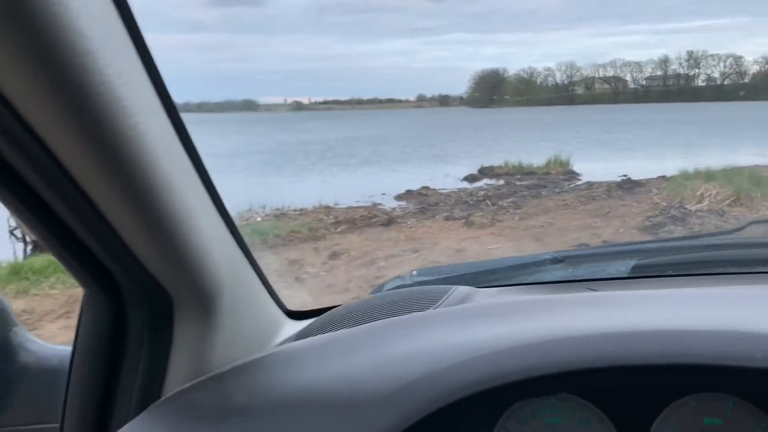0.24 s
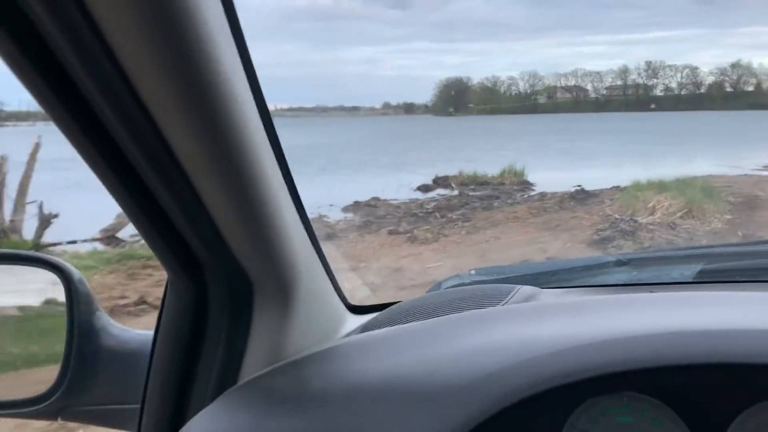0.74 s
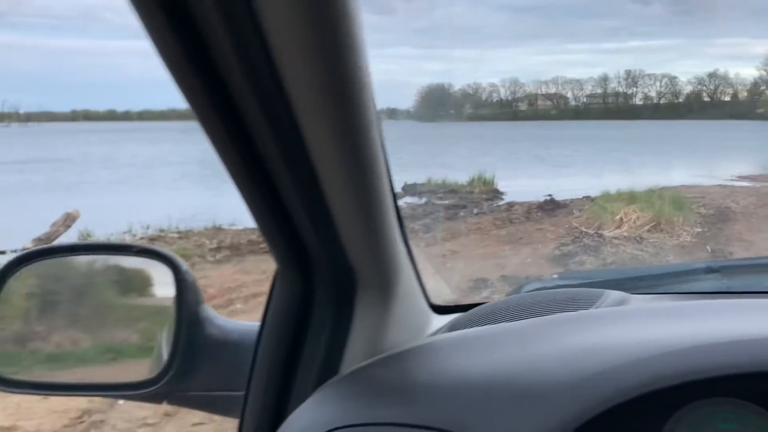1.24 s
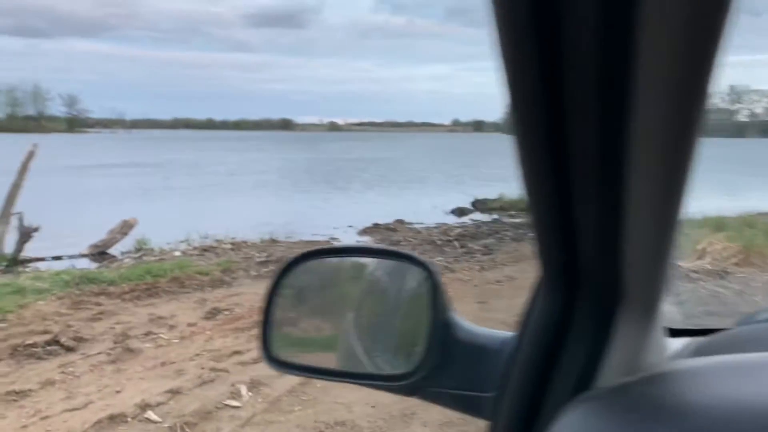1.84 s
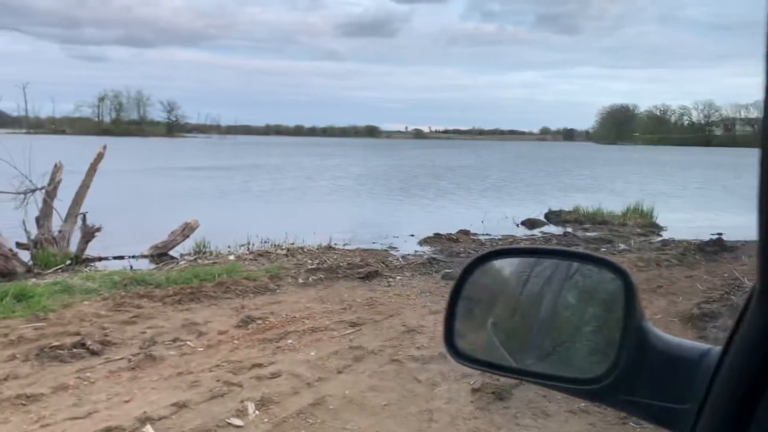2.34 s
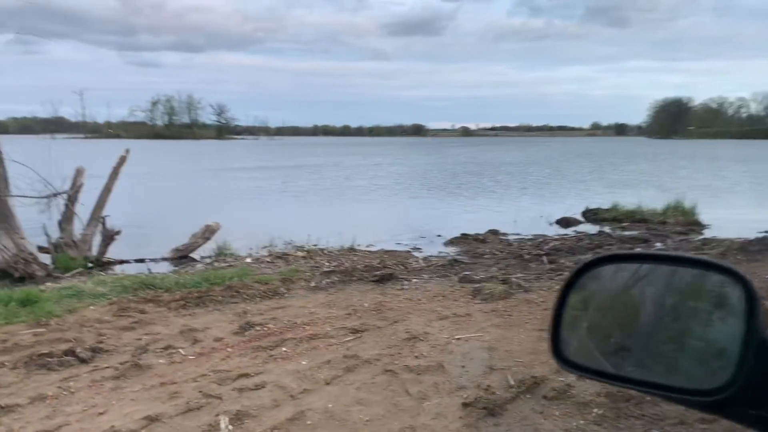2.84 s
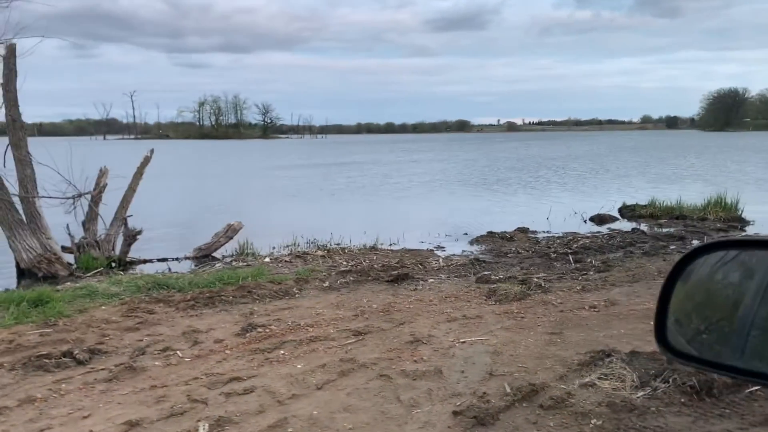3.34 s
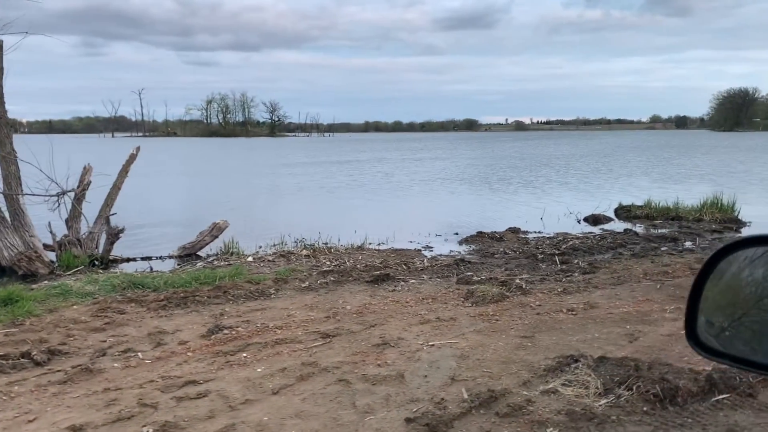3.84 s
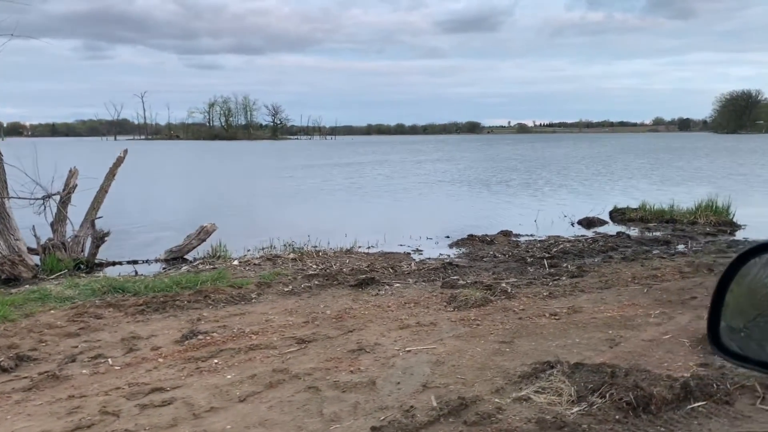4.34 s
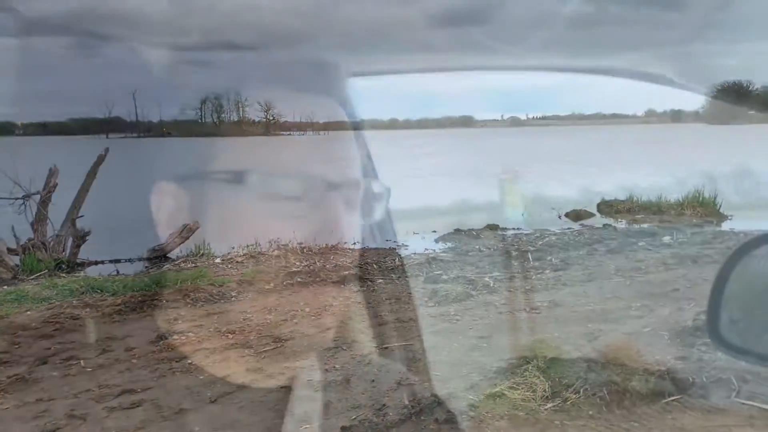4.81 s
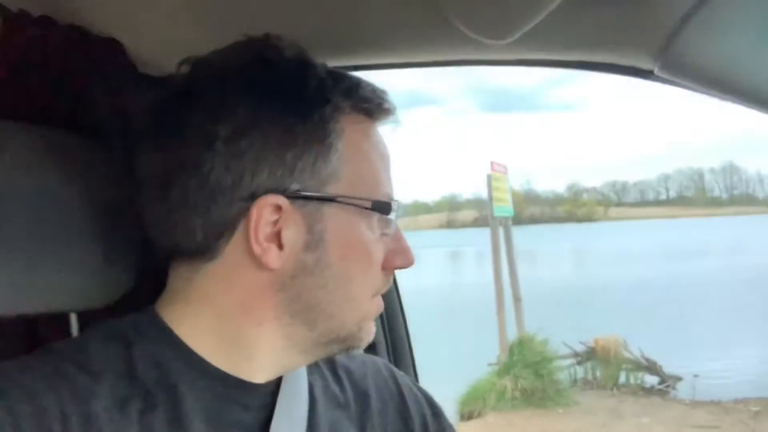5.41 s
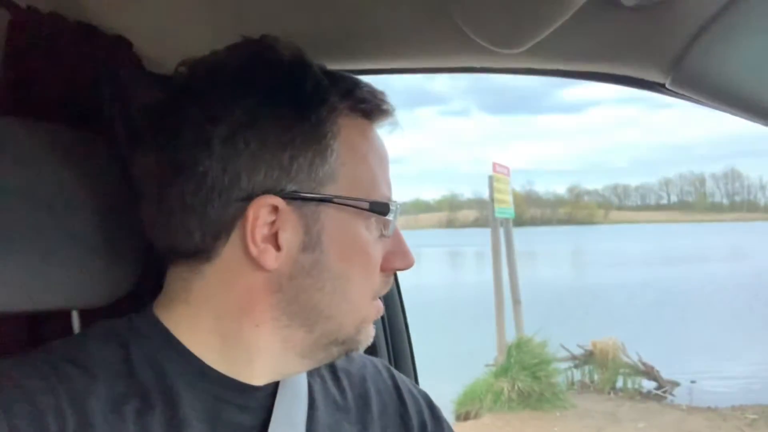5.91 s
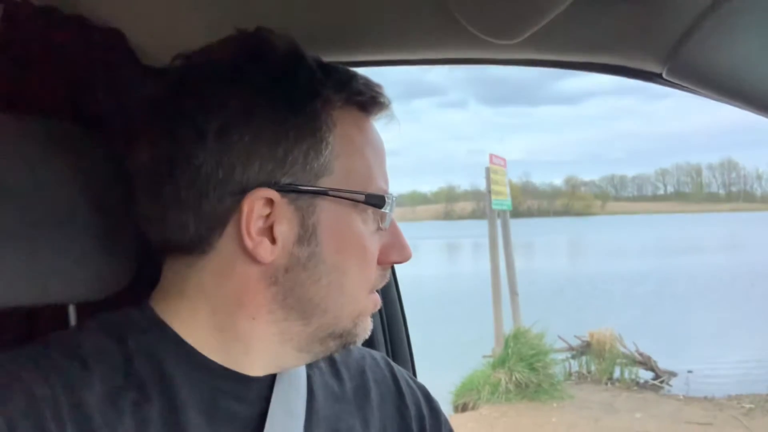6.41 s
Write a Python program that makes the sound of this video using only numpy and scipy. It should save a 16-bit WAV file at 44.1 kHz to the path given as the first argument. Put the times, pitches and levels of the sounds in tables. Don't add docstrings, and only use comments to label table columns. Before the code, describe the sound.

A close phone microphone in a van cabin hears heavy low rumble from tyres on dirt, a droning engine that speeds up and then eases, and uneven body knocks. Hands rub the steering wheel with an airy hiss. Past four seconds the drive fades away, leaving near-quiet cabin air and a low hum, one bright sharp latch click, then a run of dry stick-slip seat creaks.

```python
import sys
import numpy as np
from scipy import signal
from scipy.fft import rfft, irfft, next_fast_len
from scipy.io import wavfile
from scipy.ndimage import uniform_filter1d, minimum_filter1d

SR = 44100
rng = np.random.default_rng(int(sys.argv[2]) if len(sys.argv) > 2 else 0)


def rack_gain(trim_db):
    fader = np.asarray(trim_db, float)
    return 10 ** (fader / 20)


def store_wav(level_fs):
    pcm = np.round(np.clip(np.atleast_2d(level_fs), -1, 1) * 32767)
    wavfile.write(sys.argv[1], SR, pcm.T.astype(np.int16))


N = 293697
T = np.arange(N) / SR
HZ = np.maximum(np.fft.rfftfreq(next_fast_len(N), 1 / SR), 1)
FADE_S = (4.253, 5.42)


def curve(table, column):
    rows = np.array(table, float)
    return np.interp(T, rows[:, 0], rows[:, column], left=-150, right=-150)


def on_log(table, hz):
    rows = np.array(table, float)
    return np.interp(np.log(hz), np.log(rows[:, 0]), rows[:, 1])


def unit(x):
    return x / np.sqrt(np.mean(x ** 2) + 1e-30)


def shape(x, gain):
    return irfft(rfft(x, next_fast_len(N)) * gain, next_fast_len(N))[..., :N]


def high_pass(x, order, hz):
    return signal.sosfilt(signal.butter(order, hz, "high", fs=SR, output="sos"), x)


def walk(rate_hz):
    hold = int(SR / rate_hz)
    steps = np.repeat(rng.standard_normal(N // hold + 1), hold)
    smooth = uniform_filter1d(uniform_filter1d(steps, hold), hold)
    return unit(smooth[:N])


def ring(x, hz, t60):
    r = np.exp(-np.log(1000) / (max(t60, .003) * SR))
    w = 2 * np.pi * hz / SR
    return signal.lfilter([0, np.sin(w)], [1, -2 * r * np.cos(w), r * r], x)


# pitch_hz, side_minus_mid_db
SIDE_LEVEL = [(60, -12), (110, -17), (200, -15), (280, -6.5), (380, 0), (700, -1), (1290, 1), (2380, 0),
              (4400, -1), (8120, -3), (15000, 0.5)]


def wide(mid_side):
    lead = .6
    early = shape(mid_side[0], 1j)
    side = shape(np.sqrt(1 - lead ** 2) * mid_side[1] + lead * early, rack_gain(on_log(SIDE_LEVEL, HZ)))
    return np.array([mid_side[0] + side, mid_side[0] - side])


def noise(gain, lo_hz, hi_hz, flicker_db, rate_hz, drive=1):
    spectrum = rfft(rng.standard_normal((2, N)) * drive, next_fast_len(N)) * gain
    out = 0
    for octave in np.arange(np.log2(lo_hz), np.log2(hi_hz) + .01, .5):
        window = np.cos(np.pi * np.clip(np.log2(HZ) - octave, -.5, .5))
        band = irfft(spectrum * window, next_fast_len(N))[:, :N]
        out = out + band * rack_gain(flicker_db * walk(rate_hz))
    return out / np.std(out[0])


def blows(times, dbs, burst_s, rise_s):
    out = np.zeros((2, N + SR))
    t = np.arange(min(int(7 * burst_s * SR), SR // 3)) / SR
    swell = (1 - np.exp(-t / rise_s)) ** 2 * np.exp(-t / burst_s)
    for s, db in zip(times, dbs):
        burst = rng.standard_normal((2, len(t))) * swell
        out[:, int(s * SR):int(s * SR) + len(t)] += rack_gain(db) * burst / np.sqrt(np.sum(swell ** 2))
    return out[:, :N]


def clicks(times, dbs):
    out = np.zeros((2, N))
    at = (np.array(times) * SR).astype(int)
    out[0, at] = rack_gain(dbs)
    out[1, at + rng.integers(-12, 12, size=len(at))] = rack_gain(dbs)
    return uniform_filter1d(out, size=10) * 10


def floor_shake():
    s, thud_db, clack_db, _ = np.transpose(KNOCKS)
    shake = np.zeros(N)
    shake[(s * SR).astype(int)] = rack_gain(thud_db + 0.3 * clack_db + 40)
    shake = signal.lfilter([1], [1, -np.exp(-1 / (0.026 * SR))], shake)
    return 1 + uniform_filter1d(shake, size=400)


# time_s, rolling_force_db, rut_depth_db (above an even surface)
ROLLING = [(0, -59, 8.5), (.1, -58.5, 1), (.3, -56.5, 0.5), (.55, -56.5, 4.5), (.85, -58, 5),
           (1.05, -58.5, 5), (1.3, -58, 0.5), (1.6, -57, 0.5), (1.95, -58.5, -1.5), (2.4, -59.5, 1),
           (3, -60, -3), (3.6, -60.5, -4.5), (3.8, -58.5, 10), (4.07, -59.5, -2), (4.46, -62, -0.5),
           (4.9, -65.5, -2.5), (5.26, -76, 1.5), (5.6, -104, -7.5)]
# pitch_hz, level_db (per Hz)
ROAD_COLOUR = [(12, -37.5), (20, -2), (49, 1.5), (211, -12), (251, -15), (285, -16), (332, -19),
               (449, -30.5), (501, -26), (649, -37.5), (771, -37), (1380, -48.5), (3500, -72.5),
               (4550, -79.5), (7700, -120)]
# pitch_hz, width_hz, level_db
BODY_PANELS = [(66, 2.6, 12), (150, 11, 1.5), (208, 14, -1.5), (280.8, 17, 4), (496, 15, 2.5), (745, 23, 9)]


def tyres():
    panels = 1 + sum((rack_gain(db) - 1) / (1 + (2 * (HZ - hz) / width) ** 2) for hz, width, db in BODY_PANELS)
    gain = rack_gain(on_log(ROAD_COLOUR, HZ)) * panels
    stones = (rng.random(N) < 150 / SR) * rack_gain(np.minimum(rng.exponential(size=N), 5.0))
    crush = 1 + 0.29 * signal.lfilter([1], [1, -np.exp(-1 / (0.023 * SR))], stones)
    roll_db = curve(ROLLING, column=1)
    rut_db = np.clip(curve(ROLLING, column=2), -20, 20)
    sway_db = roll_db + 2 + .6 * rut_db + 2.5 * walk(4.6)
    boom_db = roll_db + 13.5 + rut_db
    body_db = 0.93 * (roll_db + 60.5) - 60 + 14.5 - 0.47 * rut_db
    sway = noise(gain, 21, 34, 1.9, 3.4) * rack_gain(sway_db)
    boom = noise(gain, 51.3, 72, 2.4, 7.2) * rack_gain(boom_db)
    body = noise(gain, 85.9, 290, 0.94, 4.395) * rack_gain(body_db)
    crunch = noise(gain, 368.6, 3200, 2.3, 24, crush) * rack_gain(roll_db)
    return wide(sway + boom + (body + crunch) * floor_shake()) * np.array([[.93], [1.07]])


# time_s, firing_rate_hz, boom_db
ENGINE_SPEED = [(0, 37.5, -36.5), (.1, 37.6, -51), (.19, 37.38, -37.5), (.3, 36.4, -35.5),
                (.43, 36.75, -49), (.5, 37.9, -38), (.76, 39.18, -35), (.85, 38.88, -47),
                (.98, 39.56, -31.5), (1.06, 40.97, -55), (1.13, 42.76, -33.5), (1.28, 43.5, -40.5),
                (1.45, 44.78, -36), (1.55, 44.5, -40), (1.69, 44.56, -35.5), (1.79, 44.74, -51),
                (1.86, 44.74, -40.5), (2.1, 43.13, -46.5), (2.5, 41.3, -47.5), (3, 41.15, -49.5),
                (3.4, 40, -45.5), (3.53, 40.3, -53.5), (3.73, 39.63, -45.5), (3.9, 39.46, -51),
                (4.13, 38.96, -39.5), (4.4, 39.54, -39.5), (4.7, 39.08, -45.5), (5.1, 39.03, -51),
                (5.4, 38.8, -75)]
# multiple_of_firing_rate, level_db
FIRING_OVERTONES = [(1, 0), (2, -16), (3, -12), (4, -22)]
# time_s, pitch_hz, level_db
PUMP_WHINE = [(0, 348, -57.5), (.3, 360.6, -66), (.6, 372.3, -57.5), (.8, 389.4, -61.5), (1.05, 408, -69),
              (1.3, 428, -69), (1.45, 448, -85)]
# pitch_hz, level_db
MOTOR_TONES = [(143, -62), (167, -56), (222, -62), (285.3, -60.5)]


def engine():
    firing_hz = np.maximum(curve(ENGINE_SPEED, column=1), 0) * (1 + 0.0078 * walk(8.4))
    phase = 2 * np.pi * np.cumsum(firing_hz) / SR
    boom = sum(rack_gain(db + 3.1 * walk(10.0)) * np.sin(k * phase) for k, db in FIRING_OVERTONES)
    boom = boom * rack_gain(curve(ENGINE_SPEED, column=2))
    pump_phase = 2 * np.pi * np.cumsum(curve(PUMP_WHINE, column=1)) / SR
    whine = np.sin(pump_phase) + .36 * np.sin(1.5 * pump_phase)
    pump = rack_gain(curve(PUMP_WHINE, column=2) + 2.5 * walk(10)) * whine
    drone = 0
    for hz, db in MOTOR_TONES:
        drone = drone + rack_gain(db + 3.04 * walk(3.1)) * np.sin(2 * np.pi * hz * T + 1.4 * walk(14))
    drone = drone * np.interp(T, [1.3, 2.0, *FADE_S], [0.32, 0.99, 1, 0.0092])
    return np.sqrt(2) * (boom * np.array([[.9], [1.1]]) + (pump + drone) * np.array([[1.3], [.6]]))


# start_s, thud_db, clack_db (above the thud), thud_pitch_hz
KNOCKS = [(0.2270, -26.5, -19, 138), (0.3683, -25.5, -19.5, 142.3), (0.772, -55, -9, 62),
          (1.234, -30.5, -23, 121), (1.623, -26.5, -48, 64.7), (1.766, -23.5, -25, 151.3),
          (1.793, -34.5, -33, 200), (1.81, -30.5, -45, 202), (1.824, -34.5, -53, 167),
          (1.887, -59, -34, 102), (1.984, -36, -31, 150.3), (2.395, -40, -63, 83), (3.399, -37.5, -64, 90),
          (3.687, -23.5, -66.5, 201.8), (3.715, -25, -58, 90.8), (3.8, -26.5, -58, 71.1),
          (3.879, -29, -57.5, 64.8), (4.271, -33.5, -51, 88.56), (4.15, -37.5, -50, 200),
          (4.321, -33, -57.5, 225)]
# pitch_hz, level_db, ring_s (time to fall 60 dB)
BRACKETS = [(430, -13, 0.015), (720, -1.5, 0.056), (870, -2.5, 0.036), (990, 3.5, 0.11), (1350, 2, 0.05),
            (1550, 7.5, 0.022), (1666, -3.5, 0.015), (1805, -1, 0.046), (2013, -6, 0.05),
            (2140, -20.5, 0.043), (2780, -8.5, 0.034), (3560, -6, .04), (4100, -17, .025)]


def knocks():
    s, thud_db, clack_db, _ = np.transpose(KNOCKS)
    thud = np.zeros((2, N + SR))
    t = np.arange(int(.3 * SR)) / SR
    swell = (1 - np.exp(-t / .005)) ** 2
    for at, db, rel_db, hz in KNOCKS:
        swing = np.sin(2 * np.pi * hz * t) + .5 * np.sin(2 * np.pi * 112 * t)
        low_panel = 0.23 * np.sin(2 * np.pi * 213 * t + 6 * rng.random())
        high_panel = 0.33 * np.sin(2 * np.pi * 288 * t + 6 * rng.random())
        panel = low_panel + high_panel * np.array([[1.3], [.6]])
        panel = panel * rack_gain(0.35 * (rel_db + 25.0)) * np.exp(-t / 0.028)
        sound = swing * np.exp(-t * hz / 2.75) + panel
        start = int(at * SR) - 100
        thud[:, start:start + len(t)] += rack_gain(db + 5.0) * sound * swell
    thud[:, :len(t)] += rack_gain(-35.0) * np.cos(2 * np.pi * 55 * t) * np.exp(-t / .03)
    hit = blows(s - .003, thud_db + clack_db + 1, .0125, .005)
    clack = sum(rack_gain(db - 4.0) * ring(hit, hz, 0.55 * t60) for hz, db, t60 in BRACKETS)
    crunch_band = signal.butter(2, [400, 2300], "band", fs=SR, output="sos")
    crunch = rack_gain(27.0) * signal.sosfilt(crunch_band, hit)
    dull = signal.sosfilt(signal.butter(8, 2120, fs=SR, output="sos"), clack + crunch)
    return thud[:, :N] + wide(dull + rack_gain(-16.5) * clack)


# fastest_s, speeding_up_s, slowing_down_s, fine_hiss_db, coarse_hiss_db, finest_hiss_db
SLIDES = [
    (0.798, 0.0041, 0.015, -66, -63, -68),
    (.92, 0.14, 0.23, -69, -69, -76),
    (1.38, 0.64, 0.5, -63, -65.5, -59.5),
    (1.8, 0.3, 0.16, -67.5, -67, -65.5),
    (2.2, 0.22, 0.15, -73.5, -73.5, -72),
    (2.86, 0.45, 0.22, -85, -77.5, -84.5),
    (3.06, 0.14, 0.19, -70.5, -75.5, -73.5),
    (3.16, 0.082, 0.18, -65, -71, -62.5),
    (3.27, 0.15, 0.079, -70, -68, -58),
    (3.47, 0.3, 0.27, -85.5, -88, -85),
]


def slides():
    power = 0
    t = T[::64]
    for s, rise_s, fall_s, *hiss_db in SLIDES:
        swell_db = -16.5 * ((t - s) / np.where(t < s, rise_s, fall_s)) ** 2
        power = power + rack_gain(2 * (swell_db + np.array(hiss_db)[:, None]))
    let_go = np.clip((T - .795) / 0.0046, 0, 1)
    return [np.interp(T, t, level) * let_go for level in np.sqrt(power)]


def patchy(x, patchy_db):
    z = signal.stft(x, SR, nperseg=1024)[2]
    field = uniform_filter1d(uniform_filter1d(rng.standard_normal(z.shape[1:]), size=12, axis=0), size=9)
    return signal.istft(z * rack_gain(patchy_db * unit(field)), SR, nperseg=1024)[1][:, :N]


# pitch_hz, level_db (per Hz)
SKIN_COLOUR = [(1200, 3.5), (1900, -3.5), (2700, -1.5), (4080, -2), (4760, 3), (5600, 0.5), (6650, -1.5),
               (7600, -4), (8500, -0.5), (10300, -4), (12400, -7.5), (14600, -4), (16000, -6.5)]


def hands():
    fine, coarse, finest = slides()
    skin = rack_gain(on_log(SKIN_COLOUR, HZ))
    hiss = noise(skin, 7370, 7400, 1.5, 28.25) * fine
    hiss = hiss + noise(skin, 10423, 15000, 1.6, 24.2) * finest
    hiss = hiss + noise(skin, 1842, 5220, 0.97, 17) * coarse
    return patchy(wide(hiss), patchy_db=1.4)


# start_s, level_db, left_minus_right_db
STONE_CRACKS = [
    (4.062, -25.5, -8),
]
# pitch_hz, level_db (per Hz)
STONE_COLOUR = [(1000, -11), (1850, 2.5), (2900, -13), (4500, -15), (6000, -25), (9000, -23), (14000, -30),
                (16000, -30.5)]


def cracks():
    out = np.zeros((2, N))
    for s, db, pan_db in STONE_CRACKS:
        out[:, int(s * SR)] = rack_gain(db + np.array([pan_db, -pan_db]) / 2)
    echo = 1 - .7 * np.exp(-2j * np.pi * HZ * .00029)
    return shape(out, rack_gain(on_log(STONE_COLOUR, HZ)) * echo)


# start_s, level_db, pitch_hz, length_s, left_minus_right_db
MOVING_TICKS = [(.162, -57.5, 2470, 0.013, 1), (.207, -60, 2200, 0.0047, -12),
                (.653, -52.5, 910, 0.0042, 1.5), (.775, -49.5, 1460, 0.0075, 0),
                (.777, -55, 2730, 0.012, 0), (1.107, -45.5, 810, 0.0056, -1),
                (1.107, -55, 1380, 0.0057, -12), (1.289, -48, 1274, 0.0084, 0),
                (2.022, -57, 2300, 0.003, -4), (2.022, -52, 1315, 0.0031, 5), (1.887, -53, 1000, .004, 5),
                (1.888, -63, 2350, .004, 0), (.163, -56, 1550, .006, 2), (.883, -58.5, 900, .004, 6),
                (1.013, -54, 903, 0.0054, -2), (2.236, -55, 895, 0.0039, 4), (2.384, -63, 895, 0.0035, 4),
                (2.737, -58, 898.5, 0.0034, 3), (3.243, -52.5, 1095, 0.0035, 0),
                (3.631, -66, 1900, 0.0036, -4.5), (4.03, -66, 3337, 0.0022, -0.5),
                (4.397, -54, 797.5, 0.0037, -2), (2.908, -53.5, 927, 0.0067, -1),
                (3.192, -50, 918, 0.007, -2), (4.008, -66, 2162, 0.0031, -2),
                (4.030, -55, 2500, 0.0014, -1), (4.743, -60.5, 5630, 0.0032, -3),
                (4.743, -68, 4300, 0.0027, 0), (4.741, -65, 6900, 0.0027, -2),
                (4.744, -68, 10500, .0015, 0), (4.744, -72, 12400, 0.0011, 0),
                (.503, -58.5, 2410, 0.0035, -1), (.504, -64, 3450, .002, 4), (.504, -76.5, 4700, .0015, 1),
                (.168, -66, 4000, .004, 3), (.207, -68, 3970, .003, 0), (.23, -68, 3500, 0.0037, -1),
                (3.973, -71, 11040, 0.00092, 0), (4.064, -66, 4600, .003, -2)]
# start_s, level_db, pitch_hz, length_s, left_minus_right_db
STILL_TICKS = [(4.987, -49, 1300, 0.015, -1.5), (4.988, -66, 4600, 0.012, -0.21),
               (5.5, -64, 2520, 0.014, -0.18), (4.985, -65, 14000, .018, 0), (4.985, -66, 11500, .018, 0),
               (5.459, -40.5, 13800, .004, 0), (5.477, -44, 13500, .004, 0), (5.439, -60, 3300, .008, 0),
               (4.985, -46.5, 459, 0.017, -1.87), (5.325, -52.5, 996, 0.011, -0.69),
               (5.633, -67, 4660, 0.0039, 0), (5.663, -59.5, 1340, 0.0062, -1.7),
               (5.664, -66.5, 4700, 0.0043, 0)]


def ticks(table):
    out = np.zeros((2, N + SR))
    t = np.arange(4096) / SR
    for s, db, hz, length_s, pan_db in table:
        mid, side = rng.standard_normal((2, len(t))) * np.exp(-t / length_s)
        crack = np.array([mid + 0.66 * side, mid - side])
        tone = ring(ring(crack, hz, 4.0 / hz), hz, 3.5 / hz)
        tone = tone / np.abs(tone).max(axis=1, keepdims=True)
        level = rack_gain(db + np.array([[pan_db], [-pan_db]]) / 2)
        out[:, int(s * SR):int(s * SR) + len(t)] += tone * level
    return out[:, :N]


# start_s, level_db, rise_s, decay_s
CATCH_SCRAPES = [
    (4.974, -72, 0.015, 0.017),
    (5.435, -63.5, .008, 0.012),
    (5.449, -54, .004, .004),
    (5.4546, -25.5, 0.015, 0.0048),
    (5.4735, -41, 0.001, 0.0018),
    (5.4752, -35.5, 0.0005, 0.004),
    (5.488, -70, .003, 0.0061),
    (5.491, -74, 0.011, 0.045),
]
# pitch_hz, level_db (per Hz)
SNAP_COLOUR = [(600, -49.5), (812, -23.5), (1130, -31.5), (1300, -28.5), (2090, -11), (3600, -9),
               (4000, -12), (4710, 7), (5900, 1.5), (7500, -6.5), (9000, -8), (12000, -9), (14000, -8.5),
               (16000, -16)]
# pitch_hz, level_db
SPRING_TONES = [(2132, -8.5), (3600, -6.5), (4278, -4), (4600, 3), (4833, -5.5), (5023, -6.5), (5200, -5.5),
                (5480, -7.5), (5904, -3), (6478, -10), (7564, -15), (11630, -4), (14140, -9)]


def latch():
    rattle = 0
    for s, db, rise_s, decay_s in CATCH_SCRAPES:
        rattle = rattle + blows([s], [db], decay_s, rise_s) * np.sqrt(decay_s * SR)
    gain = rack_gain(on_log(SNAP_COLOUR, HZ))
    snap = shape(rattle, gain / np.sqrt(np.mean(gain ** 2)))
    spring = sum(rack_gain(db - 32.5) * ring(rattle, hz, 0.03 * min(1, 6000 / hz)) for hz, db in SPRING_TONES)
    thump = rack_gain(-20.0) * ring(blows([5.468], [-30], 0.01, 0.00242), 272, 0.13)
    for hz, db in ((812, -10.5), (1324, -17.5)):
        thump = thump + rack_gain(db) * ring(blows([5.468], [-30], 0.0019, 0.0028), hz, 0.048)
    return wide((snap + spring) * np.array([[1], [.8]]) + thump)


def rebound():
    burst = blows([5.476], [-27], 0.0058, .0008)
    return wide(signal.sosfilt(signal.butter(3, [7900, 10300], "band", fs=SR, output="sos"), burst))


# start_s, level_db, upper_ring_db
SEAT_SLIPS = [(5.064, -67.5, -11), (5.129, -63.5, -8), (5.177, -65, -8), (5.24, -62.5, -7.5),
              (5.916, -56.5, -5), (5.949, -61, -11), (5.982, -59, -12), (6.009, -60, -13), (6.04, -58, -12),
              (6.076, -58.5, -12), (6.119, -57, -9.5), (6.19, -61, -1), (6.238, -58, -8.5),
              (6.282, -57, -8), (6.343, -60, -2.5), (6.465, -61.5, 2.5), (6.526, -58.5, -6)]
# pitch_hz, level_db, ring_s (time to fall 60 dB)
SEAT_TONES = [(785, -8, 0.06), (860, -1, 0.031), (1013, -10, 0.029), (1141, -27, 0.006),
              (1550, -15, 0.0087), (1833, 0.5, 0.022), (2020, -6.5, 0.013), (2250, -21, 0.009),
              (2600, -9.5, 0.018), (3170, -14, 0.015), (3720, -21, 0.0072)]


def seat():
    s, db, upper_db = np.transpose(SEAT_SLIPS)
    s = s + 0.0013
    rebound_s = s + 0.008 + 0.002 * rng.random(len(s))

    def slip(level_db):
        rub = blows(s, level_db + 17.0, 0.0065, 0.00068)
        return clicks(s, level_db) + clicks(rebound_s, level_db - 11.0) + rub

    low, high = slip(db), slip(db + upper_db)
    creak = sum(rack_gain(g - 19.0) * ring(high if hz > 1400 else low, hz, t60) for hz, g, t60 in SEAT_TONES)
    return wide(high_pass(creak, 4, 640))


# pitch_hz, level_db
BLOWER_HUM = [(86.1, -60), (258.4, -72.5), (430.7, -84.5)]
# pitch_hz, level_db (per Hz)
AIR_COLOUR = [(15, -49.5), (25, -20.5), (38, -8), (59, -8), (102, -5.5), (177, -20), (265, -15.5),
              (480, -39), (1830, -50), (2390, -51.5), (3670, -51.5), (7500, -56), (9750, -67.5),
              (10500, -44.5), (13600, -51), (14800, -57), (15200, -79)]


def parked():
    hum = 0
    for hz, db in BLOWER_HUM:
        level = np.sqrt(2) * rack_gain(db + 1.7 * walk(11)) * rack_gain(hz / 200 * walk(6.5))
        hum = hum + level * np.sin(2 * np.pi * hz * T + 0.29 * hz / 150 * walk(16))
    air = noise(rack_gain(on_log(AIR_COLOUR, HZ)), 30, 15500, 1.2, 5.3) * rack_gain(-60)
    side = shape(air[1], np.clip(HZ / 700, .5, 1))
    both = np.array([air[0] + side, air[0] - side])
    return (hum * np.array([[1.4], [.6]]) + both) * np.interp(T, FADE_S, [0, 1])


# pitch_hz, level_db (per Hz)
HISS_COLOUR = [(1500, -0.5), (2800, 5.5), (4000, 0), (7000, -3), (11000, 1.5), (15000, 3)]


def moving_hiss():
    hiss = wide(noise(rack_gain(on_log(HISS_COLOUR, HZ)), 2000, 15500, 0.98, 10.0))
    return hiss * rack_gain(-83) * np.interp(T, FADE_S, [1, 0])


def ports(x, sum_db, difference_db):
    mid = shape(x[0] + x[1], rack_gain(on_log(sum_db, HZ))) / 2
    side = shape(x[0] - x[1], rack_gain(on_log(difference_db, HZ))) / 2
    return np.array([mid + side, mid - side])


# pitch_hz, level_db
DRIVE_SUM = [(7200, 0), (8200, -7), (8450, -25), (8750, -25), (9150, -5), (9800, 0), (12500, -2),
             (13050, -8), (13400, -25), (13800, -25), (14250, -4), (15700, 0), (15850, -50)]
DRIVE_DIFFERENCE = [(6000, 0.5), (8700, 3.5), (10250, -1.5), (10400, -51), (11650, -31.5), (11800, 2),
                    (13500, -3), (15000, 4.5), (15250, -48.5)]
STILL_SUM = [(7300, -1.5), (7900, 0), (8400, -15), (9600, -25), (10100, -10.5), (15700, 3.5), (15850, -49)]
STILL_DIFFERENCE = [(6000, -0.5), (7600, 10.5), (9500, 6), (11800, -5), (12600, -25), (15300, -27),
                    (15600, -50.5)]


def scene():
    moving = tyres() + engine() + knocks() + hands() + ticks(MOVING_TICKS) + moving_hiss()
    still = latch() + seat() + ticks(STILL_TICKS) + parked()
    through_ports = ports(moving, DRIVE_SUM, DRIVE_DIFFERENCE) + ports(still, STILL_SUM, STILL_DIFFERENCE)
    return through_ports + cracks() + rebound()


def thin(x, weak_db, dead, busy_db, starved):
    hz, _, z = signal.stft(x, SR, "cosine", nperseg=2048)
    hz, power = hz[:, None], np.abs(z) ** 2
    luck = uniform_filter1d(rng.standard_normal(z.shape), size=7, axis=1)
    luck = unit(uniform_filter1d(luck, size=3))
    band = uniform_filter1d(power, size=8, axis=1)
    around = uniform_filter1d(power, size=90, axis=1)
    frayed = (hz > 6500) & (band < around * rack_gain(2 * (weak_db + 2.0 * luck)))
    busy = minimum_filter1d(power[0, 300:].sum(axis=0), size=5) > rack_gain(2 * busy_db)
    holes = busy & (hz > 1100) & (luck > starved + np.abs(hz - 2100) / 2200)
    total = power[0, 50:].sum(axis=0)
    sudden = total > 5 * minimum_filter1d(total, size=7)
    edge = (hz > 8000 + 380 * luck[:, :1]) & (hz < 8700) & ~sudden & np.array([[[True]], [[False]]])
    alive = (power > dead * band) | (hz < 1500)
    keep = sudden | (~frayed & ~edge & ~holes & alive)
    return signal.istft(z * keep, SR, "cosine", nperseg=2048)[1][:, :N]


def low_pass(x):
    return signal.sosfilt(signal.butter(12, 16460, fs=SR, output="sos"), x)


def record(dry):
    x = high_pass(dry, 2, 22)
    mid_side = np.array([x[0] + x[1], x[0] - x[1]]) / 2
    mid, side = thin(mid_side, weak_db=-9.0, dead=.3, busy_db=-76, starved=.05)
    return low_pass(np.array([mid + side, mid - side]))


dry = scene()
out = record(dry)
store_wav(out)
```